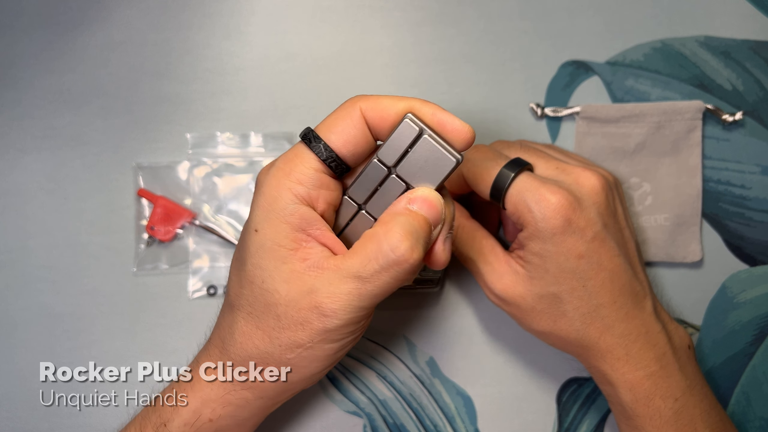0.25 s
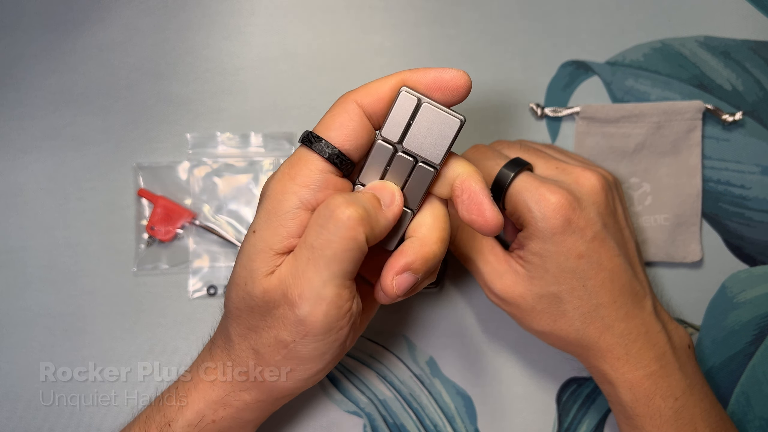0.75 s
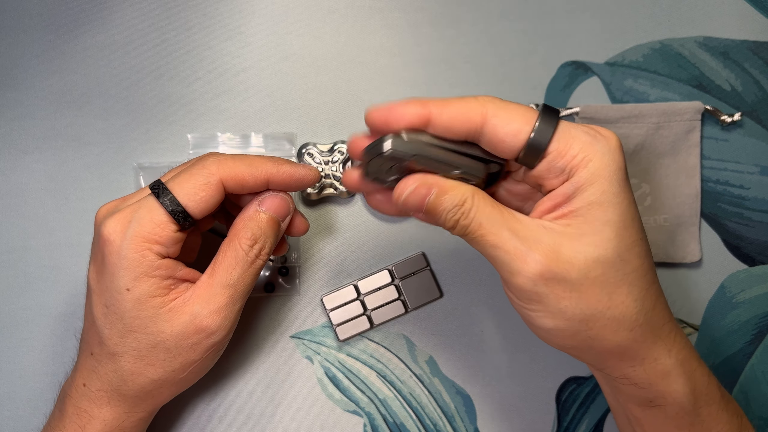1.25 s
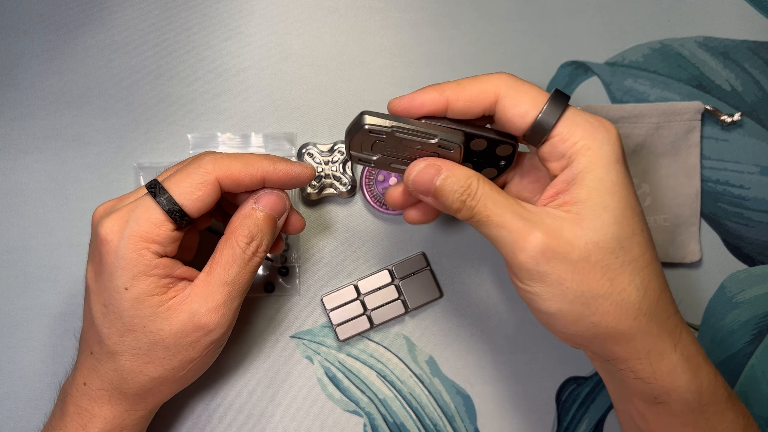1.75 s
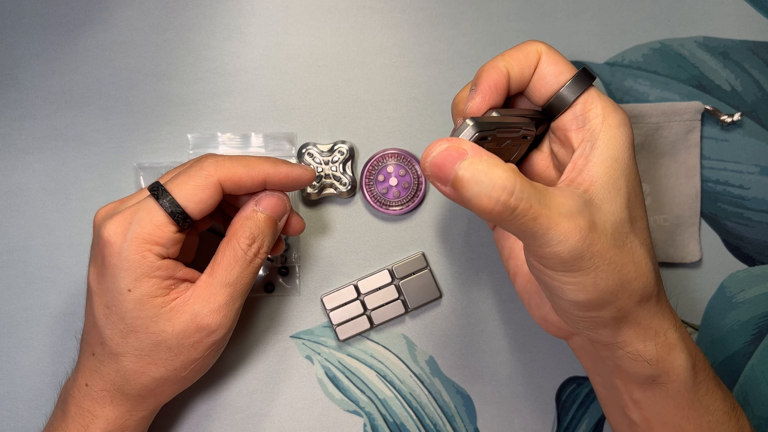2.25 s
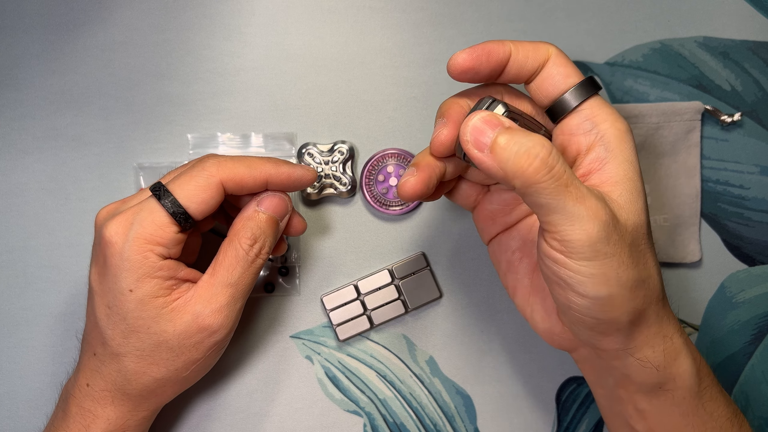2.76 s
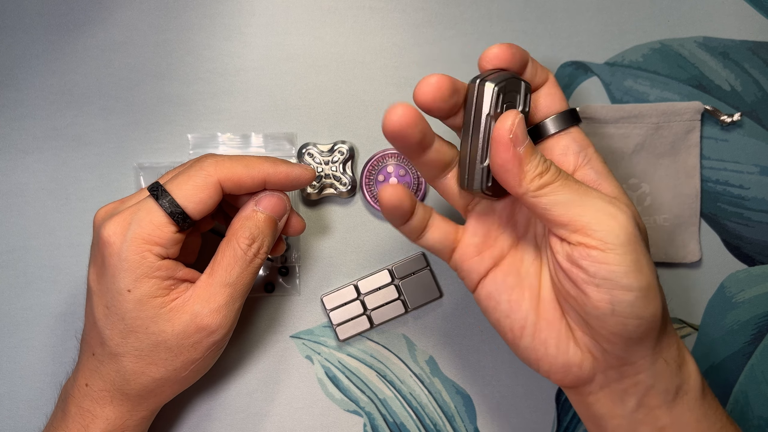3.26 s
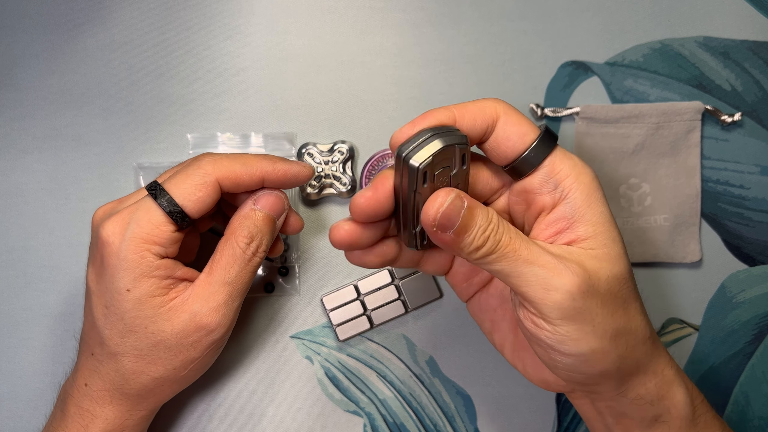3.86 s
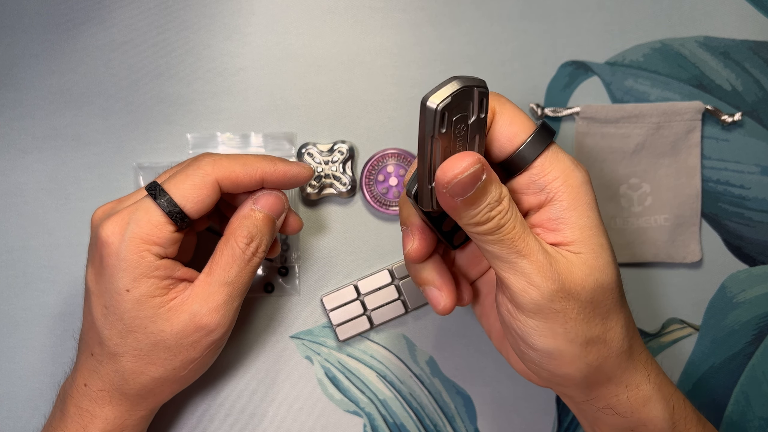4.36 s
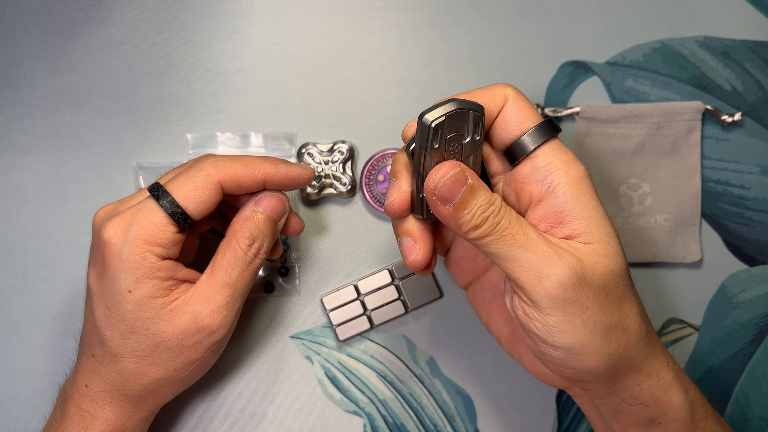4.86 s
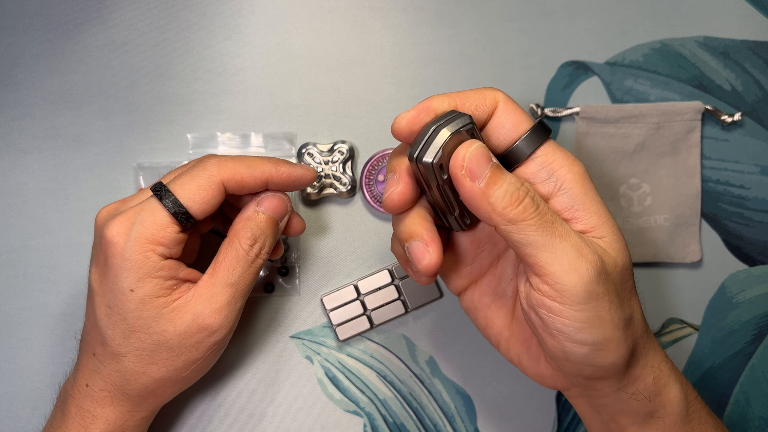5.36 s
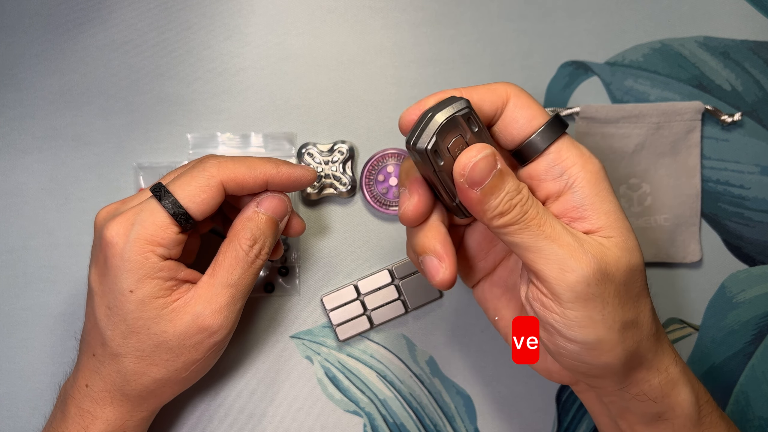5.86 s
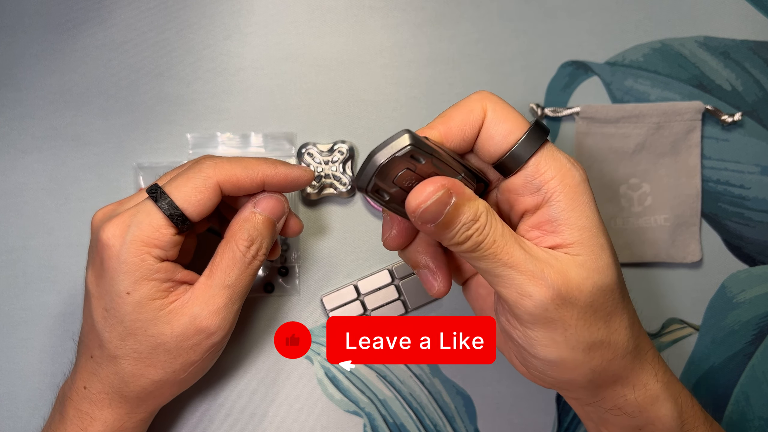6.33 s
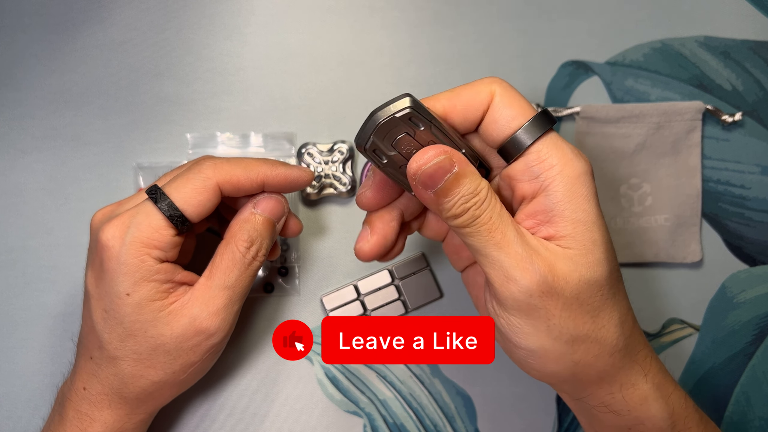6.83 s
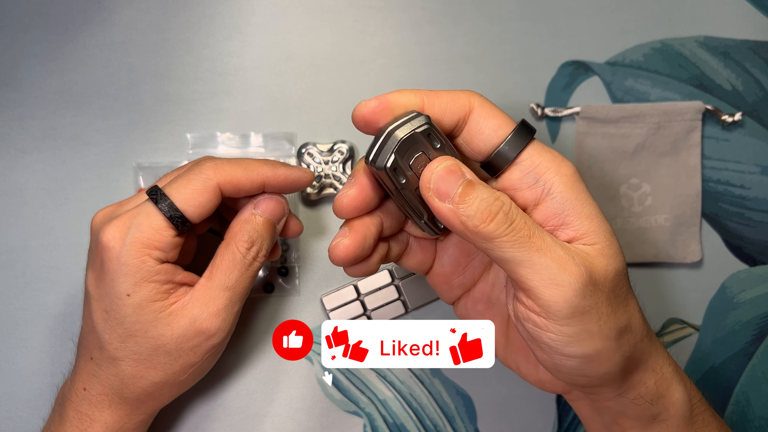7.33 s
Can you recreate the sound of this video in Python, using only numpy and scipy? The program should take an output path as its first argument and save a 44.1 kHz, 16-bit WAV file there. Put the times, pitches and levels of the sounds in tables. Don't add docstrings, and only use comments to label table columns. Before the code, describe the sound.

Crisp, uneven metallic snaps and heavier magnetic clacks at close range in a small hard room, with quiet air noise and an occasional faint low throb.

```python
import sys
import numpy as np
from scipy import signal
from scipy.fft import rfft, irfft
from scipy.io import wavfile
from scipy.ndimage import uniform_filter1d

SR = 44100
rng = np.random.default_rng(int(sys.argv[2]) if len(sys.argv) > 2 else 0)


def unload_audio(sound):
    columns = np.transpose(np.atleast_2d(sound))
    steps = np.round(np.clip(columns, -1, 1) * 32767)
    wavfile.write(sys.argv[1], SR, steps.astype(np.int16))


def amplitude_ratio(level_db):
    exponent = np.asarray(level_db, float) / 20
    return 10 ** exponent


N = 334719
LEAD = 4410
HISS_EDGE_HZ = 19000


def rocker():
    # (time [s], blow [dB], low, middle and top modes against the main ones [dB])
    snaps = [
        (-.035, -16.5, -40, -13.5, -9.5),
        (.5557, -11, -36.5, -13, -3.5),
        (.6557, -13, -34.5, -12, -1),
        (.753, -13, -17.5, -10.5, -4.5),
        (.998, -53.5, -16, -7, -33),
    ]
    # (low [Hz], low [dB], middle [Hz], main [Hz], main [dB])
    grips = [(2400, 3, 4500, 6630, 1.5), (2402, 5.5, 4300, 9100, 2.5), (2382, 2.5, 3550, 9200, 8),
             (3300, 22, 5200, 8400, 3.5), (2360, 3, 3000, 7000, 11.5)]
    # (rattle decay [ms], free middle mode [dB], band muted by a fingertip [Hz], muting [dB])
    landings = [(0.73, 8, 3300, 1), (0.48, 3, 7200, 5), (0.84, 15, 13000, 7), (0.88, 13, 4300, 11),
                (3.9, 1.5, 7200, 1.5)]
    # (centre [Hz], damping [dB])
    palms = [(1300, 2), (1300, 6), (1400, -3), (2200, -5), (1500, 2)]
    # (first [Hz], first [dB], second [Hz], second [dB])
    favoured = [(6250, 1, 13000, -4), (6370, 5.5, 17000, 4), (7500, 2.5, 4100, 6.5), (2850, 7.5, 5300, 3.5),
                (7000, 1, 13000, 1)]
    # (centre [Hz], width [Hz], level [dB])
    families = [
        [(1527, 590, 4), (2240, 870, -3.5)],
        [(3153, 620, 3), (4295, 170, -6), (5150, 780, 4)],
        [(6120, 980, -5.5), (7600, 710, 1), (8570, 330, 3), (9000, 700, -4), (10580, 660, 1)],
        [(11900, 1700, -3), (13570, 1100, -1), (15200, 1300, -2)],
    ]
    contacts = contacts_of(snaps, grips, landings, palms, favoured)
    return toy(contacts, families, rise_ms=0.086, lumpy_db=3.6, thin_hz=1300)


def slider():
    # (centre [Hz], width [Hz], level [dB])
    families = [
        [(950, 83, -13.5), (1260, 300, -26), (1500, 240, 11), (1970, 260, -4.5), (2240, 900, 9)],
        [(3090, 480, -1.5), (3563, 390, -3), (4320, 630, 0.5), (5440, 1200, 0)],
        [(5800, 530, -12), (7130, 1600, 3.5), (8310, 550, 2.5), (8570, 570, 2.5), (9400, 280, 0.5),
         (10150, 1800, -2.5)],
        [(12270, 980, -4), (13400, 700, -2), (14320, 2100, 0.5), (15700, 670, -6)],
    ]
    return toy(slider_contacts(), families, rise_ms=1.0, lumpy_db=2.5, thin_hz=915)


def slider_contacts():
    # (time [s], blow [dB], low, middle and top modes against the main ones [dB])
    main_clacks = [(1.2522, -17, -20, -15, -4), (1.36, -14, -29, -20, -5.5),
                   (1.5074, -33, -16.5, -14.5, -17), (2.236, -46.5, -20, -18, -6),
                   (2.357, -8.5, -21, -4, -9.5), (2.6639, -9.5, -7.5, -1.5, -9.5), (2.916, -48, -8, 2, -21),
                   (3.9065, -43, -17, -11.5, -1.5), (4.0527, -16, -22.5, -13, -3.5),
                   (4.1355, -22.5, -18, -20, -9), (4.2155, -31, -17, -13.5, -4.5),
                   (4.2925, -22.5, -16, -21, -13), (4.6505, -21, -36.5, -16.5, -7),
                   (4.792, -31, -10.5, -14.5, -5.5), (4.916, -37, -22, -20, -6.5),
                   (4.9605, -28.5, -18, -15, -15.5), (4.9754, -28, -6.5, -8.5, 3),
                   (5.0424, -27.5, -15, -8.5, 6), (5.0604, -12.5, -3.5, -4, -6),
                   (6.0535, -14, -12, -13, -3.5), (6.3678, -17.5, -11, -12.5, -4.5),
                   (6.772, -16, -14.5, -15.5, -5.5), (6.998, -48.5, -24, -12, -0.5),
                   (7.0835, -9.5, -28, -12.5, -7.5)]
    # (low [Hz], low [dB], middle [Hz], main [Hz], main [dB])
    grips = [(1579, 14, 4220, 8100, 2.1), (1890, 12.6, 7300, 8950, 10), (2367, 5.2, 4400, 8400, 8.2),
             (2367, 5.2, 4510, 8540, 18), (1580, 11, 3700, 7500, 3), (2040, 11, 3000, 7050, 11),
             (2530, 16, 2820, 6940, 1.7), (2280, 5, 5400, 7300, 5.3), (1590, 14, 6800, 9340, 5),
             (2160, 6.5, 5500, 8900, 12), (2280, 6, 5400, 7300, 9.8), (2020, 13, 6300, 9070, 4.8),
             (1666, 29, 5400, 8970, 12), (1440, 18.6, 4800, 10000, 3.8), (1580, 5, 5300, 6900, 8),
             (1420, 4.1, 7900, 6900, 9), (1900, 17, 1400, 9200, 6), (2414, 6, 4100, 5300, 5.1),
             (2270, 20, 5550, 7360, 6.1), (1943, 14, 3340, 9100, 0.83), (2110, 15.4, 2770, 7200, 1.8),
             (1780, 21, 2780, 7100, 5), (2290, 5, 5900, 7700, 7), (2380, 5, 5500, 7100, 2.9)]
    # (rattle decay [ms], free middle mode [dB], band muted by a fingertip [Hz], muting [dB])
    landings = [(3.5, 1, 8400, 3.5), (3.2, -0.5, 14600, 6.5), (0.76, 3, 6500, 2.2), (2.3, 4.5, 12000, 3),
                (2.8, -2, 10000, 8.7), (1.6, 4, 9700, 8.67), (1.1, 12, 10300, 16), (1.5, -2, 13000, 1.37),
                (3.3, 0, 12600, 3.7), (3.7, -6, 13500, 2.7), (1.1, -1, 12000, 1), (3.4, -6, 11000, 7.1),
                (1.9, 9, 10000, 2.7), (1.7, 2, 12000, 3), (.85, 2, 12000, 3), (1.1, 5.5, 12000, 3),
                (1.4, -16, 18000, 8), (1.1, 4.5, 14900, 9), (2, 6, 3580, 12), (3.5, -5, 12300, 3.3),
                (2.4, 10.5, 2510, 7.9), (2.5, 0.5, 12100, 5.1), (1.5, 7, 12000, 3), (1.65, 2.5, 10000, 3.8)]
    # (centre [Hz], damping [dB])
    palms = [(2000, -2), (1250, 6), (1300, -3), (1500, 2), (1400, -3), (2700, 5), (1710, 7), (1504, 7),
             (1940, -1.5), (1500, 6), (1550, 16), (1400, 10), (2700, -3.5), (1500, 1.5), (1500, 0.5),
             (1500, 1), (1300, 6.5), (1500, 2), (1500, 3.5), (1410, 0.5), (1500, 1.5), (3000, -1.5),
             (1500, 0.5), (2600, -2)]
    # (first [Hz], first [dB], second [Hz], second [dB])
    favoured = [(7200, 2, 14000, 2.6), (2250, 4, 14500, 4.4), (7000, 1, 13000, 1), (13910, 8, 15500, 6),
                (8400, 2.5, 900, 11), (3350, 5, 5100, 4), (2780, 2, 7000, 2), (7000, 1, 13000, 1),
                (2120, 3, 14000, 2.3), (2150, 3.3, 10500, 3.3), (2300, 5, 16200, 8), (9000, 4.1, 7400, 2),
                (9340, 1, 15000, 4.3), (7000, 1, 13000, 1), (7000, 1, 13000, 1), (7000, 1, 13000, 1),
                (13400, 4, 1600, 3), (7000, 1, 13400, 1), (4600, 2.5, 14000, 4), (3200, 2.5, 10900, 2.4),
                (9900, 3, 18000, 3), (3040, 3, 8900, 3), (7000, 1, 13000, 1), (6740, 3, 13500, 5)]
    # (time [s], blow [dB], rattle decay [ms], low modes above the clack's [dB])
    catches = [(1.244, -22, 6.3, 7.5), (1.25, -34, 2.4, 24.5), (1.3456, -18.5, 7, 6),
               (1.356, -26.5, 1.4, 26.5), (2.355, -23.5, 2.8, 6), (2.6613, -32, 2, -7),
               (4.0452, -26.5, 1.3, 12), (4.05, -26.5, 2.2, 25.5), (4.1174, -26.5, 2, -2),
               (4.213, -35.5, 4.6, 6), (4.636, -35.5, 1.7, 24), (4.644, -31.5, 3.3, 30),
               (4.9553, -38.5, 1.2, -3), (5.036, -38, 1.7, -2), (5.0553, -25, 1.7, 0.5),
               (6.046, -27, 1.25, -2), (6.049, -26, 3.6, 12.5), (6.356, -23.5, 5.6, -1),
               (6.7638, -26.5, 3.4, 2), (7.073, -42, 4.1, 29.5), (7.0783, -19, 3.4, 20.5)]
    # (time [s], blow [dB], rattle decay [ms], low modes above the clack's [dB])
    bounces = [
        (1.2587, -23.5, 0.91, -18),
        (2.36, -11.5, 0.91, 15.5),
        (2.3635, -17, 0.88, 14.5),
        (2.366, -18, 0.51, 16),
        (2.678, -12.5, 5.2, -2.5),
        (4.2969, -20, 0.8, -31),
        (7.005, -49, 1.4, 10),
    ]
    # (time [s], blow [dB], rattle decay [ms], low modes, top modes above the clack's [dB])
    ticks = [(1.3525, -26, 2.2, 5, 1), (1.358, -22, 1.7, 5, 1), (2.3488, -28.5, 4.1, 1, 7.8),
             (2.919, -51, 0.97, -7, 1), (4.0478, -26, 1.7, 11, 1), (4.059, -22, 2.3, 0, 1),
             (4.279, -48, 1, 2, 14), (4.2855, -39, 1, -1, 9), (4.291, -40, .8, 2, 5), (4.774, -51, 1, 0, 1),
             (4.7862, -40.5, 3.4, 0, 1), (4.9128, -50, .8, 2, 1), (4.9592, -38, 1.5, 0, 1),
             (4.9815, -31, 0.65, -2, 0.9), (5.0498, -30, 0.88, -2, 1), (6.0433, -41, 2, 7, 1),
             (6.351, -57, 3, 10, 1), (6.3613, -26.5, 2, -1.5, 1), (6.7708, -24, 1.3, 5.5, 1),
             (7.0758, -40, 2, 12, 1)]
    # (time [s], blow [dB])
    scrapes = [(1.2422, -34.5), (2.23, -55), (2.345, -50.5), (2.3455, -46), (2.658, -36.5), (3.9, -47.5),
               (4.042, -42.5), (4.281, -52), (4.283, -54), (4.633, -46), (4.788, -47.5), (4.897, -51),
               (4.906, -51.5), (6.7592, -39), (6.991, -55), (7.0697, -53)]
    # (time [s], blow [dB])
    shifts = [(2.003, -68), (3.19, -66), (3.415, -65), (5.82, -67), (5.85, -68), (5.8996, -63.5),
              (6.703, -64), (7.5503, -63)]
    scrape_ms, scrape_low_db = 5.1, -11.5
    shift_ms, shift_colour_db = 8, (-3, -4, -4.5)
    shift_grip = (2280, 5, 5350, 6800, 5, 4.25, 12000, 3.5, 1500, 1, 8200, 4, 9000, 1)

    clacks = contacts_of(main_clacks, grips, landings, palms, favoured)

    def near(s):
        return min(clacks, key=lambda row: abs(row[0] - s))[3:]

    small = []
    for s, db, ms, low_db in catches + bounces:
        low, *rest = near(s)
        small.append((s, db, ms, low + low_db, *rest))
    for s, db, ms, low_db, top_db in ticks:
        low, middle, top, grip = near(s)
        small.append((s, db, ms, low + low_db, middle, top + top_db, grip))
    for s, db in scrapes:
        small.append((s, db, scrape_ms, scrape_low_db, *near(s)[1:]))
    for s, db in shifts:
        small.append((s, db, shift_ms, *shift_colour_db, shift_grip))
    return clacks + small


def contacts_of(clacks, grips, landings, palms, favoured):
    rows = []
    for clack, grip, landing, palm, more in zip(clacks, grips, landings, palms, favoured):
        s, db, *colour = clack
        ms, *touch = landing
        rows.append((s, db, ms, *colour, (*grip, *touch, *palm, *more)))
    return rows


def toy(contacts, families, rise_ms, lumpy_db, thin_hz):
    free_widths = (340, 420, 650)
    grip_detune, grip_spread_db = .01, 1.5
    muted_width, palm_width, favoured_width = 0.085, .22, 0.042
    out, t, hz = np.zeros(N + LEAD), np.arange(768) / SR, np.fft.rfftfreq(2048, 1 / SR)
    count = sum(len(family) for family in families)
    draws = rng.standard_normal((len(contacts), 2 * len(t) + 2 * count))
    radiated = 1 / (1 + (thin_hz / (hz + 1)) ** 10)

    def bump(centre, share):
        return np.exp(-((hz / centre - 1) / share) ** 2)

    for (s, blow_db, decay_ms, low_db, middle_db, top_db, grip), draw in zip(contacts, draws):
        grains, sizes = draw[:len(t)], draw[len(t):2 * len(t)]
        chance = iter(draw[2 * len(t):].reshape(-1, 2))
        low_hz, low_free_db, middle_hz, main_hz, main_free_db, middle_free_db, *damping = grip
        muted_hz, muted_db, palm_hz, palm_db, *favoured = damping

        rise = 1 - np.exp(-t * 1000 / rise_ms)
        fall = np.exp(-t * 1000 / np.clip(decay_ms, .15, 6))
        rattle = rfft(grains * amplitude_ratio(lumpy_db * sizes) * fall * rise, 2048)
        rattle = rattle / np.sqrt(uniform_filter1d(abs(rattle) ** 2, size=5))

        free = ((low_hz, low_free_db), (middle_hz, middle_free_db), (main_hz, main_free_db))
        loose = [mode(hz, f, w, db) for (f, db), w in zip(free, free_widths)] + [0]
        power = 0
        for family, db, extra in zip(families, (low_db, middle_db, 0, top_db), loose):
            body = 0
            for (f, w, mode_db), (a, b) in zip(family, chance):
                body = body + mode(hz, f * (1 + grip_detune * a), w, mode_db + grip_spread_db * b)
            body = (body + extra) * radiated
            power = power + amplitude_ratio(2 * db) * body / body.sum()
        power = power * amplitude_ratio(-2 * muted_db * bump(muted_hz, muted_width))
        power = power * amplitude_ratio(-2 * palm_db * bump(palm_hz, palm_width))
        for f, db in (favoured[:2], favoured[2:]):
            power = power * amplitude_ratio(2 * db * bump(f, favoured_width))
        click = irfft(rattle * causal(power))[:1600] * np.sqrt(len(hz))
        add(out, s, amplitude_ratio(blow_db) * np.sqrt(SR / 400) * click)
    return out


def mode(hz, centre, width, db):
    return amplitude_ratio(2 * db) / (1 + (1.195 * (hz - centre) / width) ** 2) ** 3


def causal(power):
    cepstrum = irfft(np.log(power + 1e-12) / 2)
    fold = np.r_[1, 2 * np.ones(len(power) - 2), 1]
    return np.exp(rfft(cepstrum[:len(power)] * fold, len(cepstrum)))


def rings():
    # (time [s], frequency [Hz], level [dB], t60 [s])
    ringing = [(2.362, 3359, -40, .65), (2.362, 3499, -42, .69), (2.666, 3300, -37, .3),
               (2.666, 3500, -42, .7), (3.907, 5700, -66, .55), (5.062, 2293, -35, .25),
               (5.062, 5696, -58, .44), (5.062, 8640, -56, 1.1), (6.368, 5700, -58, .7),
               (1.36, 8640, -58, .8)]
    out, t = np.zeros(N + LEAD), np.arange(SR) / SR
    for s, hz, db, t60 in ringing:
        envelope = amplitude_ratio(db - 60 * t / t60) * (1 - np.exp(-t / .003))
        add(out, s, envelope * np.sin(2 * np.pi * hz * t))
    return out


def rubs():
    # (start [s], length [s], from [Hz], to [Hz], level [dB])
    strokes = [
        (3.21, .19, 6700, 6520, -76),
        (3.37, .09, 9000, 9000, -76),
        (3.4, .11, 5400, 4900, -78),
        (5.801, .07, 7500, 8800, -77),
        (5.92, 0.17, 6600, 8600, -70),
        (5.97, 0.083, 5200, 4880, -70),
    ]
    out = np.zeros(N + LEAD)
    smooth = signal.butter(2, 650 / 2, fs=SR)
    for s, length, from_hz, to_hz, db in strokes:
        noise, u = rng.standard_normal((2, SR // 4)), np.arange(SR // 4) / SR / length
        glide_hz = from_hz + (to_hz - from_hz) * u
        carrier = np.exp(2j * np.pi * np.cumsum(glide_hz) / SR)
        band = signal.lfilter(*smooth, noise[0] + 1j * noise[1]) * carrier
        swell = np.sin(np.pi * np.minimum(u, 1)) ** .5
        add(out, s, amplitude_ratio(db) * swell * evened(band.real))
    return out


def room(direct, echoed, sent):
    # (delay [s], level [dB])
    echoes = [(.0014, -6), (.0032, -11.5), (.0066, -9.5), (.0082, -17.5), (0.0148, -20), (0.0162, -22),
              (.0203, -19.5), (0.0289, -28)]
    # (frequency [Hz], t60 [s])
    tail_t60 = [(900, 0.16), (1500, 0.24), (2300, 0.27), (5500, 0.29), (9000, 0.26), (15000, 0.26)]
    # (frequency [Hz], level [dB])
    tail_colour = [(900, -2.5), (1550, -10.5), (1950, -1), (2300, 1.5), (4000, 1), (7000, -0.85),
                   (11000, -1), (15000, -1.5)]
    early = np.zeros(SR // 20)
    scatter = rng.standard_normal((len(echoes), 80)) * np.exp(-np.arange(80) / 9.0)
    for (s, db), blur in zip(echoes, scatter):
        blur = unstriped(blur, fine=1, coarse=41)
        early[round(s * SR):][:80] += amplitude_ratio(db) * blur / np.linalg.norm(blur)
    wet = direct + signal.oaconvolve(echoed, early)[:len(direct)]

    slots = np.arange(0, SR // 2, 12)
    phase = 2 * np.pi * np.arange(len(sent)) / SR * 70
    for k in range(3):
        taps = np.zeros(SR // 2 + 12)
        taps[slots + rng.integers(0, 12, len(slots))] = rng.choice([-1., 1.], len(slots))
        hz, t, z = signal.stft(taps, SR, nperseg=256)
        decay_db = read(tail_colour, hz)[:, None] - 60 * t / read(tail_t60, hz)[:, None]
        z = z * (hz < HISS_EDGE_HZ)[:, None] * amplitude_ratio(decay_db)
        tail = signal.istft(z, SR, nperseg=256)[1]
        n = np.arange(len(tail))
        tail = tail * (1 - np.exp(-(n / SR / 0.0079) ** 2))
        tail = unstriped(tail, fine=61, coarse=601) * (n < len(tail) - 2048)
        share = np.sqrt(2 / 3) * np.cos(phase + k * np.pi / 3)
        wet += signal.fftconvolve(sent * share, tail / np.linalg.norm(tail))[:len(sent)]
    return wet


def unstriped(x, fine, coarse):
    z = rfft(x)
    power = abs(z) ** 2 + 1e-12
    ratio = uniform_filter1d(power, size=coarse) / uniform_filter1d(power, size=fine)
    return irfft(z * np.sqrt(abs(ratio)), len(x))


def ventilation():
    # (frequency [Hz], density [dB per Hz])
    air_colour = [(24, -35), (40, -4.5), (77, -13), (203, -15), (236, -23), (267, -13.5), (409, -22),
                  (463, -21), (763, -25.5), (932, -28.5), (2350, -34), (2660, -37), (15700, -49)]
    # (frequency [Hz], level [dB])
    hiss_colour = [(2500, -0.5), (6000, -0.3), (10300, 3), (11600, -4), (12600, -3.5), (14000, 1),
                   (15600, 0.5)]
    # (centre [Hz], width [Hz], level [dB])
    ducts = [(63.6, 14, -62), (151.4, 10, -61), (207.7, 12, -60.5), (266, 3.1, -67), (327.5, 14, -68.5),
             (466, 9, -66.5), (926, 88, -70.5), (2270, 60, -76)]
    hz = np.fft.rfftfreq(N, 1 / SR)
    white = rfft(rng.standard_normal((2, N)))
    low_cut = hz ** 6 / (hz ** 6 + 47.0 ** 6)
    shape = amplitude_ratio(read(air_colour, hz) + read(hiss_colour, hz)) * (hz < HISS_EDGE_HZ) * low_cut
    air = amplitude_ratio(-56.5) * evened(irfft(white[0] * shape, N))
    peaks = 0
    for f, w, db in ducts:
        peaks = peaks + amplitude_ratio(2 * db) * SR / (np.pi * w) / (1 + (2 * (hz - f) / w) ** 2) ** 2
    return air + irfft(white[1] * np.sqrt(peaks), N)


def throb():
    # (start of full speed [s], length [s], level [dB])
    runs = [
        (0.258, .57, -51.5),
        (2.95, 0.54, -51),
        (5.622, 0.57, -52),
    ]
    run_up, run_down = 199, 280
    wobble_db, wobble_hz, wobble_peak_s, wobble_span_s = 3, 6.8, .2, 0.11
    load_s, sag_hz, recover_s = .25, 5, .14
    t, level, hz = np.arange(N) / SR, 0, 32
    for s, length, db in runs:
        ramps = run_up * np.maximum(s - t, 0) + run_down * np.maximum(t - s - length, 0)
        u = t - s - wobble_peak_s
        wobble = wobble_db * np.cos(2 * np.pi * wobble_hz * u) * np.exp(-(u / wobble_span_s) ** 2)
        level = level + amplitude_ratio(db - ramps + wobble)
        hz = hz - sag_hz * (t > s + load_s) * np.exp(-abs(t - s - load_s) / recover_s)
    return np.sqrt(2) * level * np.sin(2 * np.pi * np.cumsum(hz) / SR)


def evened(x):
    return x / np.sqrt(np.mean(x ** 2) + 1e-20)


def read(points, hz):
    f, value = np.transpose(points)
    return np.interp(np.log(hz + 1), np.log(f + 1), value)


def add(mix, s, sound):
    part = mix[round(s * SR) + LEAD:][:len(sound)]
    part += sound[:len(part)]


def scene():
    snaps = rocker()
    clacks = slider()
    echoed = amplitude_ratio(0.5) * snaps + clacks
    sent = amplitude_ratio(-5.0) * snaps + amplitude_ratio(-4.5) * clacks
    toys = room(snaps + clacks, echoed, sent) + rings() + rubs()
    return (toys[LEAD:] + ventilation() + throb())[None]


def band_limit(x):
    return signal.sosfilt(signal.butter(12, 17020, fs=SR, output="sos"), x)


def record(dry):
    held = dry / (1 + np.abs(dry) ** 8) ** (1 / 8)
    edge = signal.firwin(511, 15850, window=("kaiser", 7.0), fs=SR)
    shelf = amplitude_ratio(-24) * signal.firwin(511, 16750, window=("kaiser", 8.0), fs=SR)
    limited = signal.oaconvolve(held, (edge + shelf)[None], "same")
    return band_limit(limited)


dry = scene()
out = record(dry)
unload_audio(out)
```